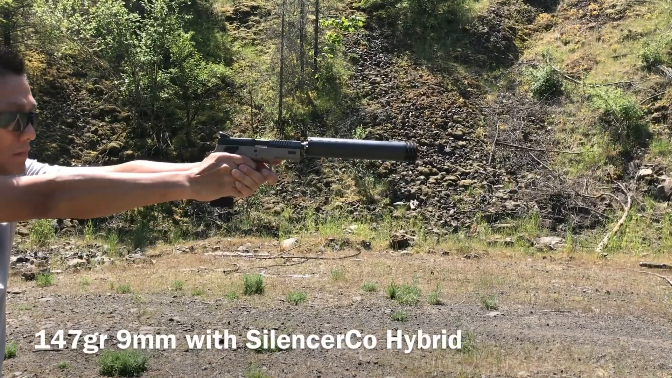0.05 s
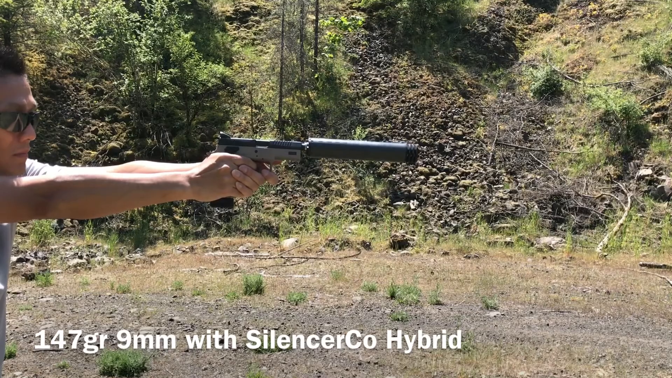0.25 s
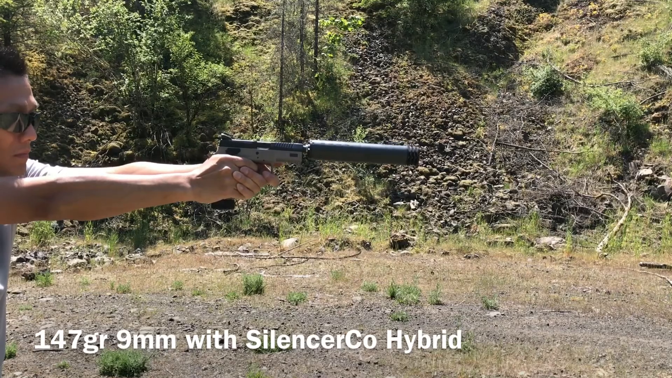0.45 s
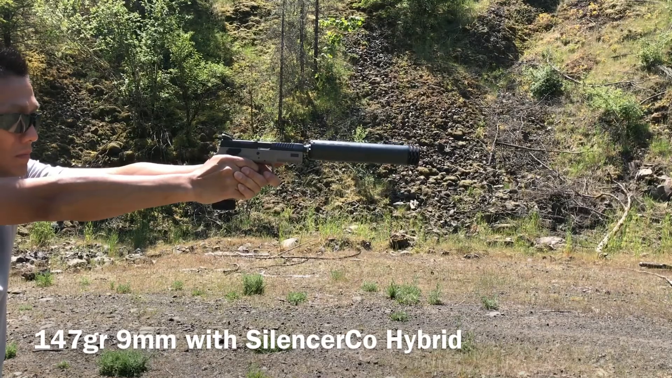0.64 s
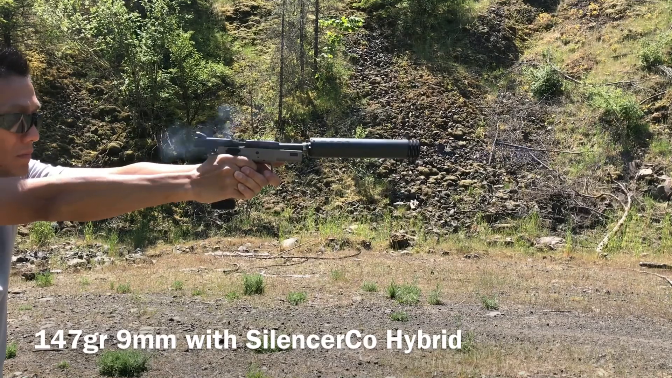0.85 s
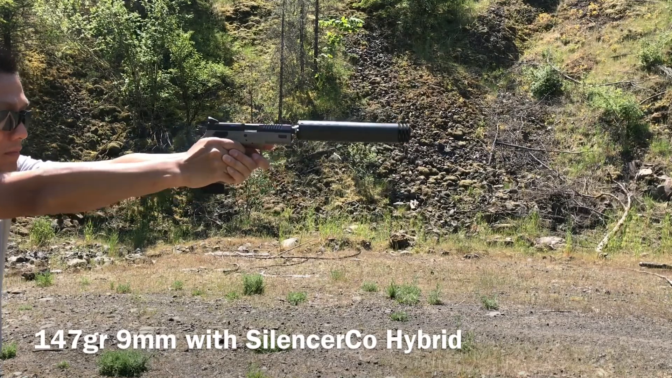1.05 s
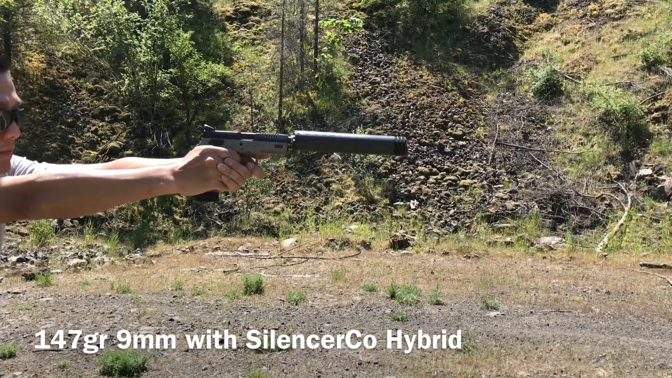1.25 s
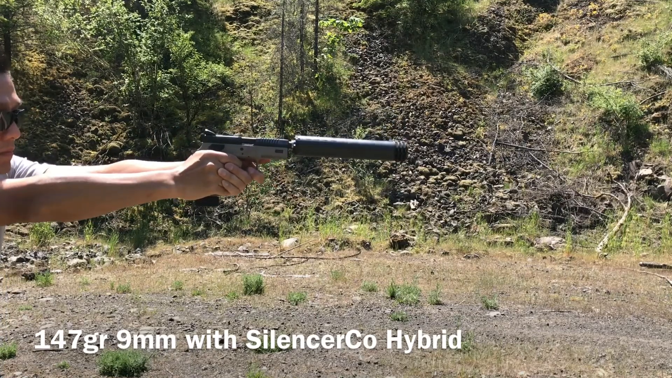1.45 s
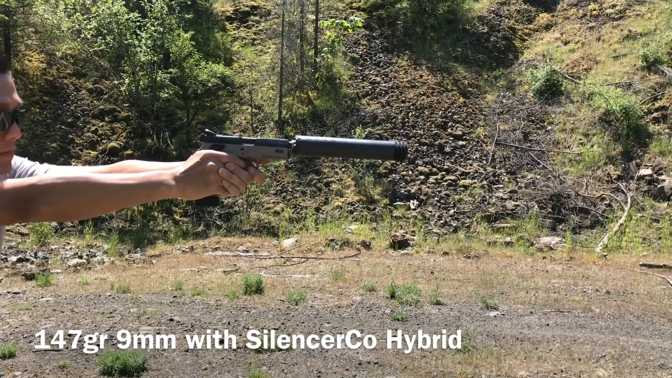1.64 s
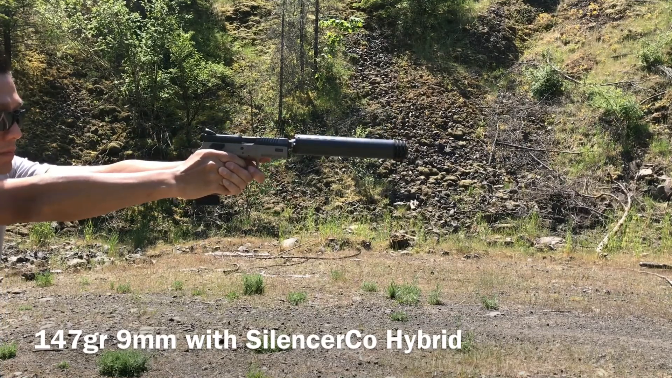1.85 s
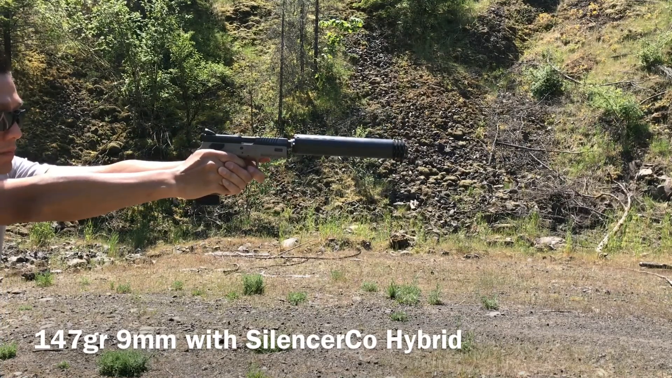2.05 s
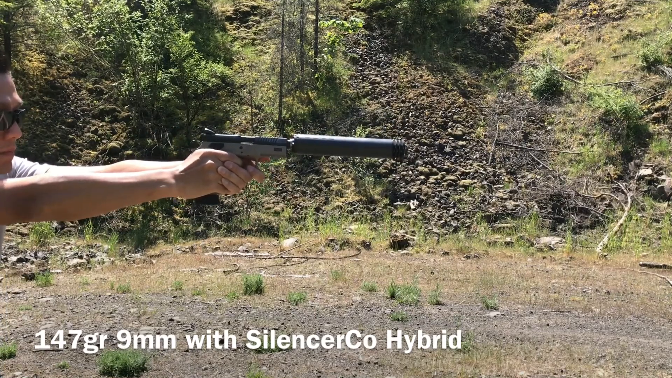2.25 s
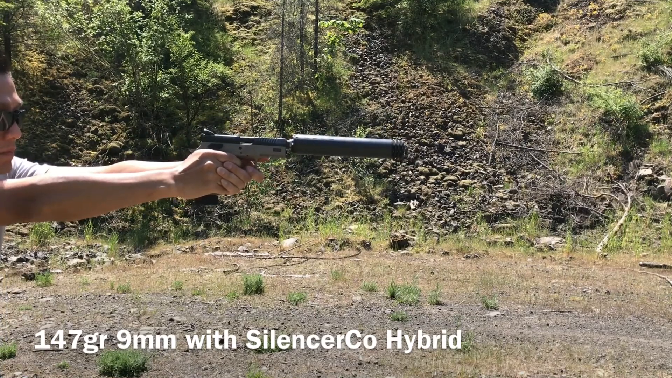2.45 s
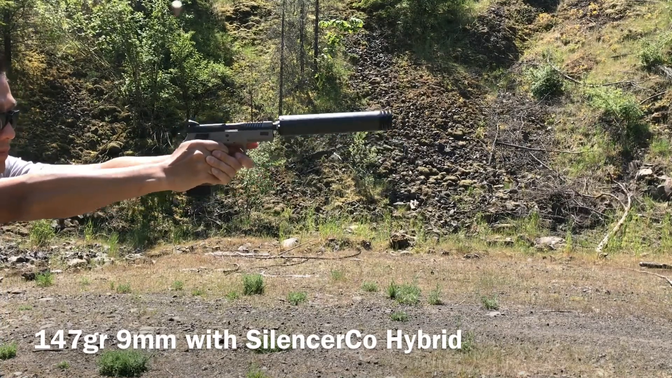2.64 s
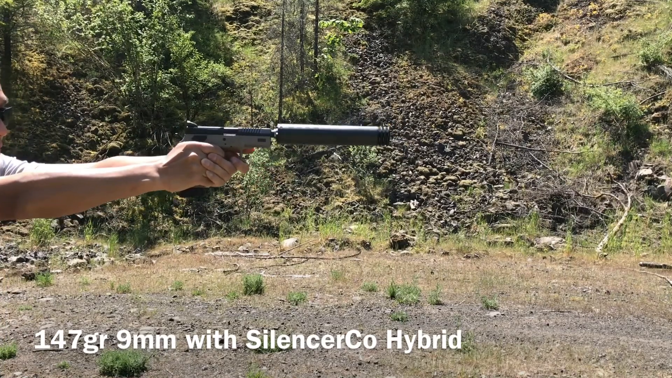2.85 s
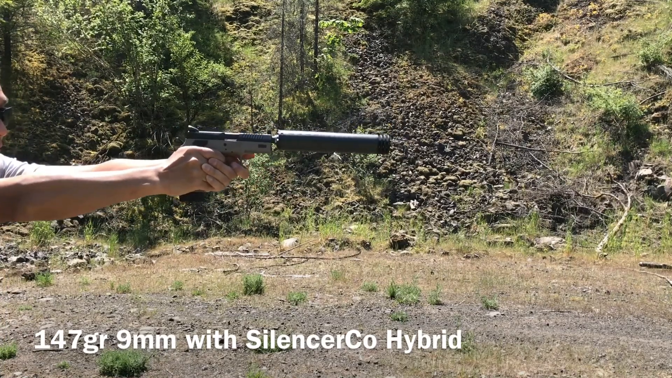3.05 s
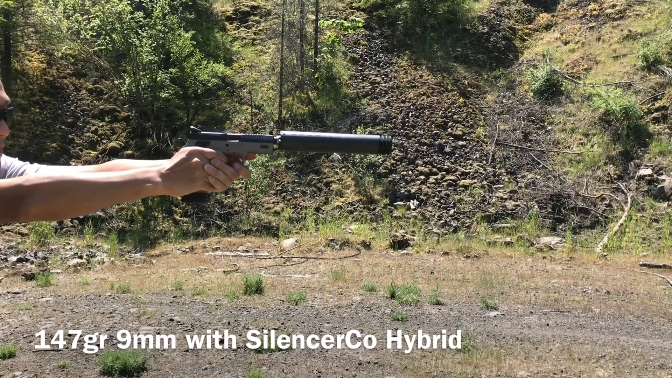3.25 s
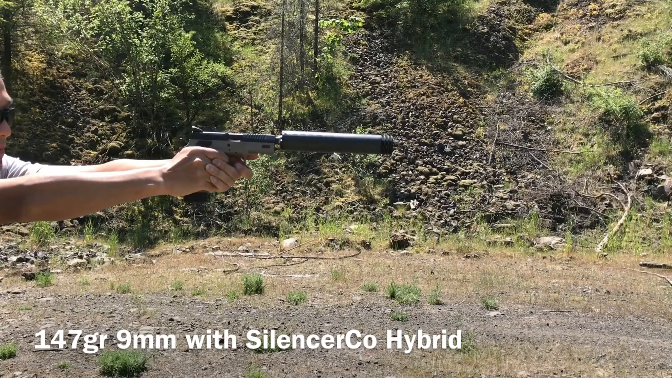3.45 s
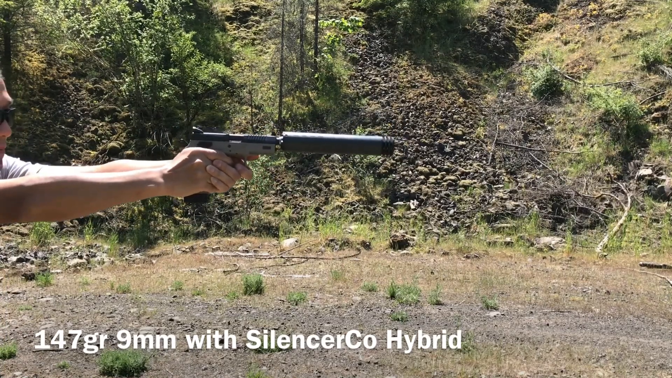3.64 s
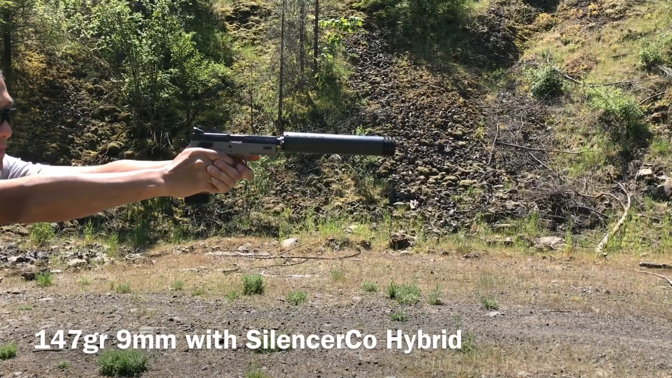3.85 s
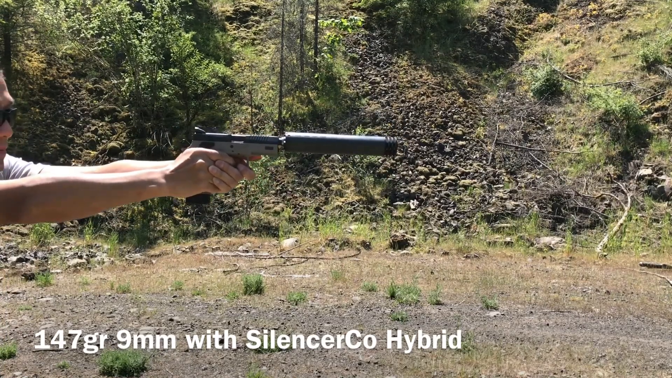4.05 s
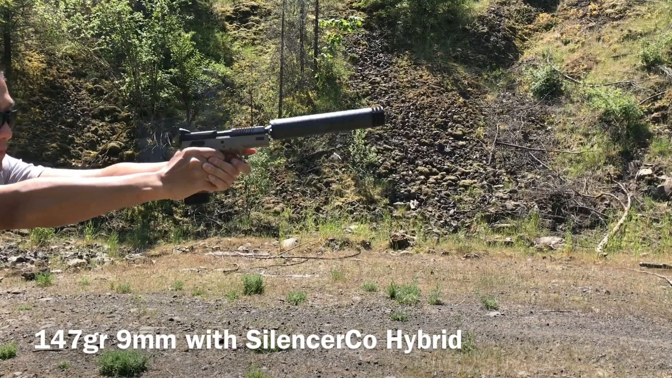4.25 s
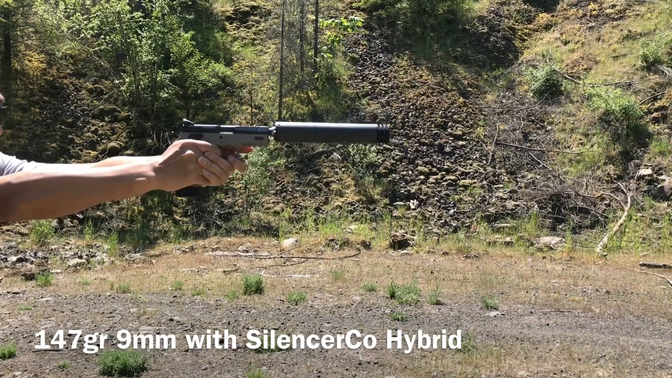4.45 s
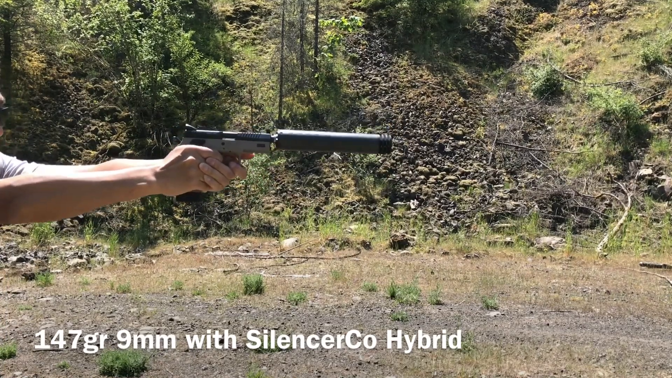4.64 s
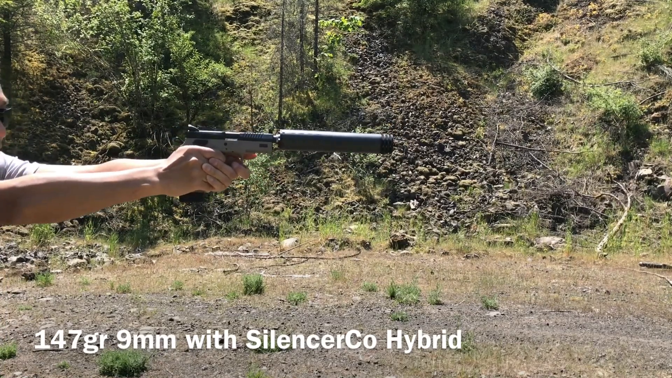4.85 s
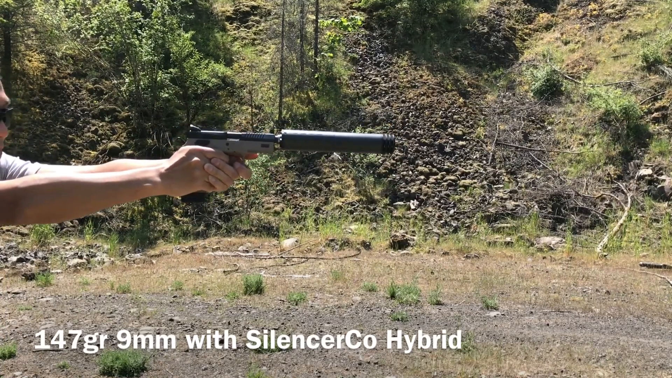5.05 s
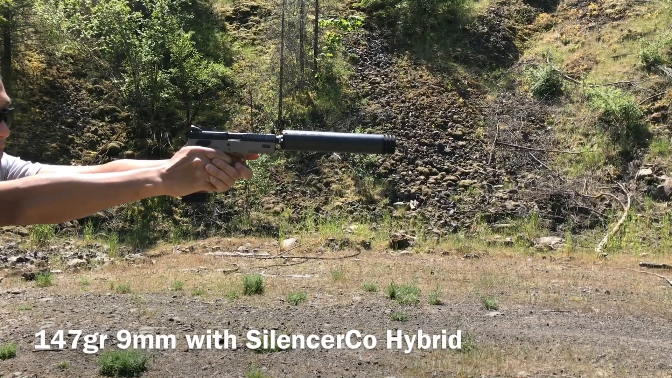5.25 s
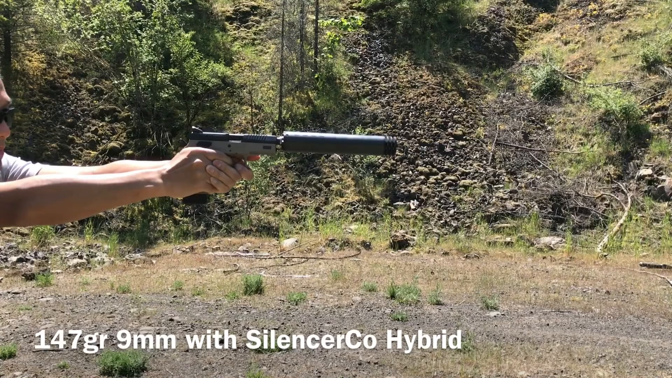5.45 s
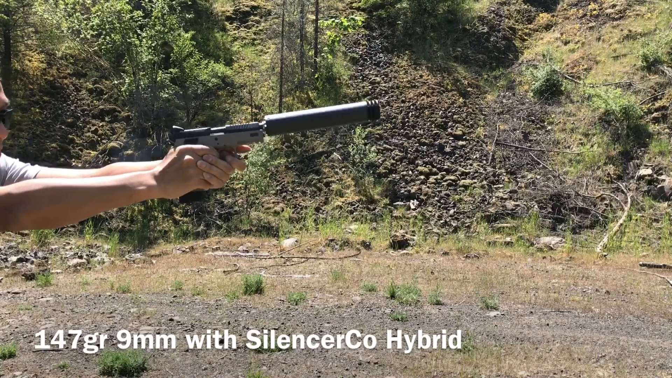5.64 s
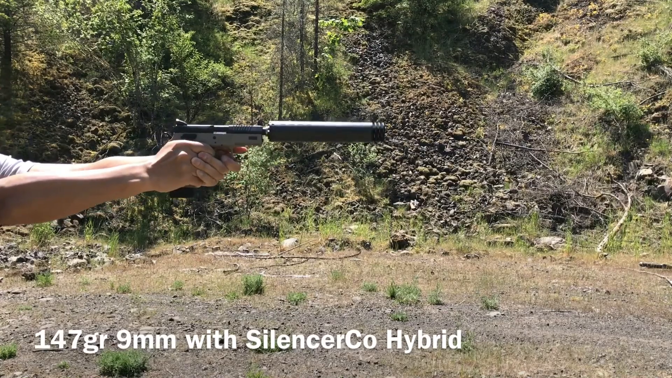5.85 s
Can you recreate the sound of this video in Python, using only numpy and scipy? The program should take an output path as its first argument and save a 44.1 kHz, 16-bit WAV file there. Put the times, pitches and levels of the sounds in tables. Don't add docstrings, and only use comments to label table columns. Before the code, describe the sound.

Four spaced suppressed pistol shots outdoors, each a blunt gassy thump with slide clack, followed by sharp bullet cracks and hillside echoes in light wind.

```python
import sys
import numpy as np
from scipy import signal
from scipy.fft import rfft, irfft
from scipy.io import wavfile
from scipy.ndimage import uniform_filter1d

SR = 44100
rng = np.random.default_rng(int(sys.argv[2]) if len(sys.argv) > 2 else 0)


def gain_from_db(level_db):
    decades = np.asarray(level_db, float) / 20
    return 10 ** decades


def master(y):
    cut = np.clip(np.atleast_2d(y).T, -1, 1)
    pcm = np.round(cut * 32767)
    wavfile.write(sys.argv[1], SR, pcm.astype(np.int16))


N = 260190
T = np.arange(N) / SR

# f/Hz, level/dB
AIR_SPECTRUM = [(240, -25), (400, -1.5), (1150, -0.5), (2400, -13), (4500, -14.5), (7000, -22.5),
                (15500, -26), (16500, -48.5)]
# t/s, level/dB
RUSTLE = [(0, 0.5), (.9, -0.5), (2.2, 0), (3.5, 0), (4.15, -3.5), (5.9, 1.9)]
# t/s, rumble level/dB
BREEZE = [(0, -47.5), (.9, -46), (1.05, -49.5), (1.6, -40.5), (2.15, -46.5), (2.5, -47), (2.75, -56),
          (3.1, -44.5), (3.6, -43.5), (4, -30.5), (4.4, -48.5), (4.9, -38.5), (5.33, -44), (5.6, -44),
          (5.76, -49), (5.9, -47)]
# t/s, rumble level/dB, length/s
EDDIES = [(0.145, -74, 0.021), (0.442, -46.5, 0.06), (0.597, -49.5, 0.04), (0.851, -45, 0.1),
          (1.377, -63, 0.16), (1.53, -42, 0.034), (1.662, -38, 0.028), (1.773, -38, 0.035),
          (2.05, -45, 0.031), (2.31, -33.5, 0.034), (2.429, -50, 0.068), (3.19, -37.5, 0.051),
          (3.45, -45.5, 0.1), (3.685, -34, 0.066), (3.87, -35, 0.062), (4.143, -36, 0.064),
          (4.299, -30.5, .04), (4.453, -45, 0.056), (4.63, -38, 0.07), (4.752, -51, 0.093),
          (5.034, -36, 0.051), (5.161, -33.5, 0.039), (5.458, -43, 0.062), (5.602, -33, 0.091),
          (5.9, -38.5, 0.057)]
# t/s, sharp level/dB, soft level/dB
BUFFETS = [(.45, -58, -40.5), (1.2, -58, -46.5), (1.335, -59, -48), (1.403, -70, -45), (1.465, -57, -42),
           (1.541, -45, -37.5), (1.737, -62, -35.5), (1.985, -58, -42.5), (2.306, -31, -33),
           (2.964, -66, -45), (3.118, -64, -48.5), (3.151, -43, -46), (3.21, -49, -49), (3.891, -36, -42),
           (3.911, -42, -35.5), (3.946, -40.5, -42), (4.086, -48, -37), (4.098, -24, -22),
           (4.127, -42, -43), (4.157, -37, -24), (4.609, -45, -37), (4.628, -35, -33.5), (4.645, -52, -39),
           (4.715, -58, -51), (4.885, -66, -60), (5.001, -58, -29.5), (5.016, -46, -32.5),
           (5.057, -43, -25), (5.435, -58, -38.5), (5.502, -47, -39), (5.518, -56, -33),
           (5.599, -48.5, -44)]
# t/s, level/dB, f/Hz
PUFFS = [(0.364, -37.5, 60), (0.448, -35, 89), (0.483, -41, 65), (0.581, -36.5, 87), (0.755, -42, 59.7),
         (0.836, -38, 74.6), (1.03, -46, 96), (1.325, -39, 69), (1.37, -36, 70), (1.404, -43, 120),
         (1.463, -35.5, 114), (1.515, -33.5, 160), (1.561, -37, 80), (1.593, -35.5, 65),
         (1.659, -29.5, 94.8), (1.766, -31, 84), (1.796, -33, 64.6), (2.04, -36.5, 116), (2.075, -34, 85),
         (2.288, -36.5, 100), (2.327, -30, 75), (3.118, -35, 90), (3.16, -33.5, 95), (3.188, -27, 151),
         (3.227, -29.5, 99), (3.379, -36.5, 90), (3.463, -27.5, 55), (3.551, -33, 96), (3.667, -28.5, 69.5),
         (3.848, -27, 93), (3.893, -32, 115), (3.94, -31.5, 68.6), (4.004, -31.5, 75), (4.039, -31.5, 65.4),
         (4.076, -27.5, 80), (4.13, -26, 65.5), (4.157, -23.5, 124), (4.193, -33, 79), (4.349, -44, 75),
         (4.44, -33.5, 65), (4.578, -29.5, 60), (4.632, -28, 130), (4.678, -37, 60.1), (4.748, -35, 75),
         (4.781, -33, 95.3), (5.001, -28.5, 85), (5.04, -27, 100), (5.091, -29.5, 50.3),
         (5.146, -30.5, 89.5), (5.186, -30, 75), (5.431, -33, 70), (5.499, -32, 76.2), (5.537, -26, 71),
         (5.581, -29, 135)]
# t/s, length/s, first f/Hz, last f/Hz, level/dB
BIRD = [
    (.012, .092, 6100, 4750, -75),
    (.098, .077, 4760, 4460, -64),
    (.22, 0.07, 3080, 3340, -72),
    (.28, 0.053, 3330, 3870, -62),
    (.4, .025, 5300, 4660, -68),
    (.462, 0.036, 5540, 4500, -64.5),
    (.588, .062, 5700, 3610, -64.5),
    (.645, .028, 3600, 2950, -75),
    (.69, .045, 4150, 4500, -73),
]
# t/s, length/s, first f/Hz, last f/Hz, level/dB
INSECT = [
    (.44, 0.027, 11300, 11200, -57),
    (1.79, 0.056, 10840, 10900, -61.5),
    (2.16, 0.079, 10800, 10640, -70),
    (3.38, .03, 10800, 10900, -65),
    (5.065, 0.063, 12750, 12500, -68),
]
# share of note/1, level/dB
BIRD_SWELL = [(0, -2.5), (.7, -0.5), (1, -1)]
INSECT_SWELL = [(0, 2), (.4, -7), (1, -10)]
SPLINTER_SWELL = [(0, 3), (.5, 2), (1, 0)]
# centre t/s, first f/Hz, length/ms, level/dB
CHIPS = [(.422, 4240, 3.6, -57), (.429, 4100, 15, -55), (.445, 3700, 3.2, -40.5), (.453, 3820, 16, -51),
         (.528, 3600, 5.6, -52), (.545, 3760, 20, -55), (.603, 3640, 3.9, -55)]
# t/s, level/dB, strongest f/Hz
GRIT = [(.4445, -42, 3200), (0.451, -43, 3600), (.545, -51, 4400), (1.768, -46, 4400), (1.7833, -38, 1316),
        (2.1938, -47, 1690), (2.339, -44, 5530), (2.346, -39.5, 7000), (2.399, -51, 4410),
        (3.3381, -43, 4400), (3.386, -26, 2400), (3.386, -33, 13000), (3.393, -42, 6470),
        (3.869, -46.5, 3600), (4.198, -48, 2830), (4.3517, -28, 2600), (4.539, -48, 4360),
        (5.118, -45, 2300), (5.599, -51, 2530)]
BLOW_BANDS = [1300, 4400, 11300]
# f/Hz, width/Hz, level/dB
TRIGGER_MODES = [(1750, 2400, 5), (3300, 250, 8.5), (5650, 1700, 5), (10200, 1030, 2), (12640, 800, -4)]
# f/Hz, width/Hz, level/dB
STEEL_MODES = [(1860, 2400, 7), (3100, 630, -0.5), (5290, 270, 9.5), (8900, 460, 2), (12260, 1000, 4)]
FIRED = [
    .9014,
    2.5918,
    4.2534,
    5.6401,
]
# t/s, low level/dB, middle level/dB, high level/dB
HAMMER = [(-.0222, -33, -28, -32), (-.0198, -34.5, -34, -35.5), (-.0166, -36.5, -27, -31),
          (-.0112, -39, -34.5, -41)]
# t/s, low level/dB, middle level/dB, high level/dB
BLAST = [(.0001, -6.5, -6.5, -16), (.0031, -12, -2, -19), (.0063, -13.5, -7, -18),
         (0.0111, -15, -6.5, -11.5)]
# t/s, low level/dB, middle level/dB, high level/dB
SLIDE = [
    (-.009, -30.5, -24, -24),
    (-.0043, -24.5, -20.5, -20),
    (0, -18, -11, -6.5),
    (.0055, -31.5, -28, -22),
    (0.0111, -32, -27, -25.5),
]
# hammer level/dB, blast level/dB, slide level/dB, hammer pace/1, shutting t/s from ignition
STROKES = [(2.5, 0.34, .1, 1.03, .0459), (0, 1, -1.25, .93, .0456), (.5, 0, .6, .96, .0449),
           (-1.5, -2, -0.45, 1.0, .045)]
# level/dB, decay/s
GAS_BURSTS = [(-11.5, .018), (-13, 0.019), (-13, 0.016), (-10.5, 0.014)]
# f/Hz, level/dB
GAS_SPECTRUM = [(180, -32.5), (300, -10.5), (717, -16), (863, -13.5), (2000, -12), (3530, -8), (4030, -9.5),
                (5640, -3.5), (7630, -12.5), (14700, -12.5), (16500, -31.5)]
HAMMER_SONG = [-13.5, -12.5, -22, -14.5]
# centre t/s, first f/Hz, length/ms, level/dB
ROCKS = [(0.9, 2580, 20, -48), (1.145, 3720, 27, -44), (1.19, 3300, 24.6, -55.5), (1.325, 3300, 24, -52.5),
         (1.552, 3230, 10, -53), (2.742, 3600, 12, -34.5), (2.75, 2640, 14, -39), (2.772, 3900, 9.8, -40),
         (2.79, 2630, 16, -44), (2.802, 4300, 8, -52), (2.838, 3220, 11.3, -43), (2.871, 2780, 7, -39),
         (2.882, 3900, 13, -37), (2.893, 2720, 10, -41), (2.92, 3020, 14, -44), (2.922, 4000, 23, -50),
         (2.948, 4000, 28, -50), (2.955, 2830, 16, -48), (2.982, 2480, 9.7, -52), (2.6, 2400, 16, -50),
         (3.015, 2300, 26, -49), (3.17, 2740, 20, -55.5), (3.218, 2780, 14, -56), (3.258, 2630, 21, -46.5),
         (3.292, 3130, 16, -47.5), (3.335, 3480, 21.1, -53.5), (3.362, 3380, 14, -51.5),
         (4.4, 3300, 6.4, -48), (4.45, 3220, 7.1, -52), (4.452, 1500, 16.5, -44.5), (4.57, 2980, 8, -62),
         (5.786, 3400, 7.9, -40.5), (5.805, 2920, 12, -50), (5.822, 2810, 16, -48), (5.85, 2810, 8.5, -52),
         (5.867, 4000, 5, -37), (5.885, 2800, 7.3, -47), (5.896, 2750, 6.8, -42)]
# f/Hz, level/dB, crest t/s from ignition, length/s
TUBE_MODES = [
    (205, -13.5, .0038, 0.0042),
    (760, -12.5, .0012, 0.001),
    (530, -16, .0035, 0.0038),
]
TUBE_LEVELS = [0.46, -1, -1.5, 1]
KNOCK_LEVELS = [-22.5, -22, -21, -25]
# f/Hz, level/dB, t60/s
NEAR_DECAY = [(800, -53, 0.17), (1411, -48.5, 0.39), (2400, -45.5, 0.23), (4000, -45, 0.88),
              (6000, -38.5, 0.43), (8850, -42, 0.34), (13000, -41, .22)]
# t/s, level/dB, slowness/1, first crest/1
THUMPS = [(.909, -3.8, 1.03, .25), (2.6013, -5.2, .95, 1.1), (4.2637, -12.3, 1.19, .8),
          (5.6488, -5.8, 1.0, .6)]
# f/Hz, width/Hz, level/dB
STEEL_TAIL = [(3300, 900, -3), (5400, 370, 2), (7000, 1500, -6), (9400, 1500, -7), (12500, 3000, -11)]
# first t/s, last t/s, level/dB
SWARMS = [(0.963, 1.104, -50.5), (1.099, 1.252, -56), (1.251, 1.704, -61.5), (2.661, 2.799, -48.5),
          (2.796, 2.96, -47), (3.05, 3.378, -62), (4.326, 4.597, -52.5), (4.601, 4.95, -63),
          (5.742, 5.885, -51)]
# f/Hz, level/dB
SLOPE_SPECTRUM = [(400, -25.5), (800, -16.5), (1300, -7.5), (2300, -1.5), (3400, -0.5), (4600, -9),
                  (6500, -10), (10000, -24.5), (13000, -36.5)]
# loudest t/s, level/dB, swell/(dB/s), fade/(dB/s)
RETURNS = [(0.974, -37, 2996, 142), (1.139, -40, 148, 114), (1.33, -55.5, 153, 11), (2.69, -48, 302.5, 22),
           (2.831, -32, 63, 132), (2.955, -45.5, 79.5, 500), (3.331, -52.5, 20.5, 68), (3.7, -63.5, 33, 11),
           (4.345, -69, 897, 123), (4.445, -40, 900, 300), (4.505, -47.5, 118, 112), (4.75, -61.5, 38, 7),
           (5.715, -57, 905, 50), (5.9, -35, 83, 100)]
RETURN_TREBLE = [7.5, -0.5, -2.5, 0, 2.5, -0.5, -5, -2.5, -3.5, 1, 1.5, 0, -3, -1.5]
# t/s, peak level/dB, f/Hz, ring/ms, grit level/dB
STRIKES = [
    (1.0753, -3, 5130, 0.081, -30.5),
    (2.823, -9, 6600, 0.093, -30.5),
    (2.8215, -19, 2000, 0.27, -35),
    (4.429, -17.5, 5700, 0.17, -43),
    (4.4293, -20.5, 3450, 0.18, -45),
    (4.4314, -29, 2020, 1, -50),
    (5.861, -19.5, 5000, 0.089, -37),
    (5.8639, -23.5, 3500, 0.089, -41),
]
# t/s, f/Hz, level/dB
RICOCHETS = [
    [(1.08, 860, -58), (1.11, 787, -57), (1.155, 677, -57), (1.22, 580, -58), (1.29, 510, -79)],
    [(2.835, 587, -53), (2.874, 922, -51), (2.898, 1080, -53), (2.935, 1126, -58), (2.985, 1060, -67),
     (3.02, 984, -61), (3.07, 900, -71), (3.12, 823, -75)],
    [(2.64, 274, -48), (2.7, 282, -61), (2.81, 290, -76)],
    [(2.86, 560, -59), (2.91, 595, -65), (2.96, 620, -66)],
]
# t/s, high level/dB, low level/dB, middle level/dB
RESETS = [
    (1.5665, -18.5, -25.5, -21),
    (3.6661, -17, -27, -21.5),
    (5.1277, -16.5, -30, -21),
]
BOUNCE = [-22, -24, -22]
# t/s, level/dB, chatter delay/s
SNAPS = [(1.56648, -11, .0003), (3.66615, -9, .0005), (5.12768, -8.5, .0005)]
# f/Hz, level/dB, t60/s
SEAR_MODES = [(1210, -23.5, 0.018), (1786, -20, 0.011), (3213, -16, .006), (4900, -27.5, 0.0029),
              (5903, -15, 0.0057), (6880, -16.5, 0.0055), (9850, -3.5, 0.0022), (12030, -7, .003)]
# t/s, length/s, first f/Hz, last f/Hz, level/dB
SPLINTERS = [(2.805, 0.0257, 2453, 1463, -38.5), (2.824, 0.027, 6100, 3470, -34.5),
             (2.827, 0.0146, 7500, 5600, -34), (2.834, .014, 3100, 2100, -38.5),
             (2.866, .014, 2900, 1900, -42), (2.874, 0.016, 4180, 2710, -36),
             (2.886, .014, 2800, 2000, -39), (2.767, 0.0135, 3890, 2790, -34.5),
             (2.776, 0.015, 2580, 1490, -39.5), (2.905, .02, 3520, 2290, -49)]
# first t/s, last t/s, hiss level/dB
COARSE = [(.878, 1.485, -4), (1.566, 1.975, 0), (2.569, 3.232, -4), (3.666, 4.075, 0), (4.23, 4.93, -4),
          (5.127, 5.535, 0), (5.617, 5.9, -4)]
# f/Hz, level/dB
HUM = [(9663, -95.5), (10740, -96.5), (11811, -92.5), (12882, -100), (13959, -95.5), (15030, -97)]


def unit(x):
    return x / np.sqrt(np.mean(x ** 2))


def band(lo_hz, hi_hz, order=2):
    sos = signal.butter(order, [lo_hz, hi_hz], "band", fs=SR, output="sos")
    return unit(signal.sosfilt(sos, rng.standard_normal(N)))


def coloured(table):
    hz, db = np.transpose(table)
    f = np.arange(N // 2 + 1) * SR / N + 1
    weight = gain_from_db(np.interp(np.log(f), np.log(hz), db, -90, -90))
    return unit(irfft(rfft(rng.standard_normal(N)) * weight, N))


def ring(x, hz, width_hz):
    return signal.lfilter(*signal.iirpeak(hz, hz / width_hz, SR), x)


def walk(rate):
    k = max(int(SR / rate), 2)
    held = np.repeat(rng.standard_normal(N // k + 1), k)
    return uniform_filter1d(uniform_filter1d(held, k), k)[:N]


def fade(start, tau, rise=.0002):
    t = np.maximum(T - start, 0)
    return (1 - np.exp(-t / rise)) * np.exp(-t / tau)


def bell(s, length):
    return np.exp(-((T - s) / length) ** 2)


def notes(rows, swell):
    u = np.linspace(0, 1, 9)
    shape_db = np.interp(u, *np.transpose(swell))
    return [np.transpose([s + length * u, from_hz + (to_hz - from_hz) * u ** 0.99, db + shape_db])
            for s, length, from_hz, to_hz, db in rows]


def whistles(tracks, waver, flutter_db, share):
    out = np.zeros(N)
    for rows in tracks:
        s, hz, db = np.transpose(rows)
        on = (T > s[0]) & (T < s[-1])
        t, w = T[on], waver[on]
        edge = np.clip(np.minimum(t - s[0], s[-1] - t) / 0.0055, 0, 1)
        pitch = np.interp(t, s, hz) * (1 + share * w)
        level = gain_from_db(np.interp(t, s, db) + flutter_db * w)
        out[on] += edge * level * np.sin(2 * np.pi * np.cumsum(pitch) / SR)
    return out


def clumps(rows, fall):
    out = np.zeros(N + 4000)
    t = np.arange(-2000, 2000) / SR
    for (s, from_hz, ms, db), noise in zip(rows, rng.standard_normal((len(rows), len(t)))):
        u = t / ms * 2000
        hz = from_hz * (1 + fall + (fall - 1) * np.clip(u, -2, 2)) / 2
        rough = .45 + unit(uniform_filter1d(uniform_filter1d(noise, size=36), size=36))
        i = int(s * SR) - len(t) // 2
        out[i:i + len(t)] += gain_from_db(db) * rough * np.exp(-u ** 2) * np.sin(2 * np.pi * np.cumsum(hz) / SR)
    return out[:N]


def clanks(rows, modes, rise, tau, low_tau):
    out, t = np.zeros(N + 1200), np.arange(1200) / SR
    edges = [(600, 2700), (2300, 8500), (7500, 17000)]
    filters = [signal.butter(2, pair, "band", fs=SR, output="sos") for pair in edges]
    for (s, *dbs), noises in zip(rows, rng.standard_normal((len(rows), 3, len(t)))):
        i = int((s - rise) * SR)
        for sos, db, noise, fall in zip(filters, dbs, noises, [low_tau, tau, tau]):
            blow = noise * (1 - np.exp(-t / rise)) * (np.exp(-t / fall) + .05 * np.exp(-t / .0035))
            rung = blow + sum(gain_from_db(g) * ring(blow, hz, w) for hz, w, g in modes)
            x = signal.sosfilt(sos, rung)
            out[i:i + len(t)] += gain_from_db(db + 1.0) * x / np.max(np.abs(x))
    return out[:N]


def air():
    return coloured(AIR_SPECTRUM) * gain_from_db(-65 + np.interp(T, *np.transpose(RUSTLE)) + walk(2.3))


def wind():
    gust = gain_from_db(np.interp(T, *np.transpose(BREEZE)))
    gust = gust + sum(gain_from_db(db) * bell(s, length) for s, db, length in EDDIES)
    stirred = np.minimum(sum(bell(row[0], 0.015) for row in BUFFETS), 1)
    rumble = gain_from_db(-4) * unit(band(36, 105) * gain_from_db(3 * walk(16)))
    flutter = unit(band(120, 320, order=3) * gain_from_db(4.5 * walk(40)))
    out = gust * (rumble + flutter * (gain_from_db(-19.5) + gain_from_db(-11) * stirred))
    t = np.arange(-900, 900) / SR
    for (s, sharp_db, soft_db), (wide, turn) in zip(BUFFETS, rng.random((len(BUFFETS), 2))):
        sharp = np.sin(2 * np.pi * ((420 + 200 * wide) * t + turn)) * np.exp(-np.abs(t / 0.0014) ** 1.1)
        soft = np.sin(2 * np.pi * ((170 + 110 * turn) * t + wide)) * np.exp(-((t - .002) / 0.0046) ** 2)
        i = int(s * SR) - len(t) // 2
        out[i:i + len(t)] += gain_from_db(sharp_db + 1) * sharp + gain_from_db(soft_db) * soft
    return out


def calls(waver):
    direct = whistles(notes(BIRD, BIRD_SWELL), waver, 1, .002)
    direct = direct + whistles(notes(INSECT, INSECT_SWELL), waver, 1.3, .005)
    t = np.arange(9000) / SR
    trail = uniform_filter1d(rng.standard_normal(len(t)), size=4) * np.exp(-t / .12) * np.clip(t / .04, 0, 1)
    return direct + gain_from_db(-34.0) * signal.fftconvolve(direct, trail)[:N]


def puffs():
    out, t = np.zeros(N), np.arange(-1500, 1500) / SR
    for s, db, hz in PUFFS:
        i = int(s * SR) - len(t) // 2
        out[i:i + len(t)] -= gain_from_db(db) * np.cos(2 * np.pi * hz * t) * np.exp(-(t * hz / 0.84) ** 2)
    return out


def chips():
    return clumps(CHIPS, 0.97)


def grit():
    octaves = [np.abs(np.log2(np.array(BLOW_BANDS) / hz)) for s, db, hz in GRIT]
    rows = [(s, *(db - 7.5 * away)) for (s, db, hz), away in zip(GRIT, octaves)]
    return clanks(rows, TRIGGER_MODES, .00006, .0005, .0016)


def action():
    rows = []
    for s, (hammer_db, blast_db, slide_db, pace, shut) in zip(FIRED, STROKES):
        rows += [(s + at * pace, *(np.array(dbs) + hammer_db)) for at, *dbs in HAMMER]
        rows += [(s + at, *(np.array(dbs) + blast_db)) for at, *dbs in BLAST]
        rows += [(s + shut + at, *(np.array(dbs) + slide_db)) for at, *dbs in SLIDE]
    scatter = 1.5 * rng.standard_normal((len(rows), 4)) * [0, 1, 1, 1]
    return clanks(np.array(rows) + scatter, STEEL_MODES, .0003, .0012, .0014)


def gas():
    jet = coloured(GAS_SPECTRUM) * gain_from_db(1.6 * walk(600))
    boom = band(170, 640)
    out = 0
    for s, (gas_db, tau), sing_db in zip(FIRED, GAS_BURSTS, HAMMER_SONG):
        burst = jet * fade(s, tau) + gain_from_db(-4.5) * boom * fade(s - .001, 0.0066, rise=0.0011)
        before = np.where((T > s - .015) & (T < s), np.exp(np.minimum(T - s, 0) / 0.0087), 0)
        shudder = before * (gain_from_db(sing_db) * np.sin(2 * np.pi * 3100 * T) + gain_from_db(-11.5) * boom)
        rattle = gain_from_db(-29.5) * jet * ((T > s - .0225) & (T < s))
        out = out + gain_from_db(gas_db) * (burst + shudder + rattle)
    return out


def rocks():
    return clumps(ROCKS, .79)


def tube():
    out, fall = 0, .66
    for s, shot_db, stroke, knock_db in zip(FIRED, TUBE_LEVELS, STROKES, KNOCK_LEVELS):
        for hz, db, crest, length in TUBE_MODES:
            swing = np.cos(2 * np.pi * hz * (T - s - crest))
            out = out + gain_from_db(db + shot_db) * swing * bell(s + crest, length)
        u = (T - s - stroke[-1] + .0042) / .0015
        hz = 2400 * (1 + fall + (fall - 1) * np.clip(u, -1, 1)) / 2
        out = out + gain_from_db(knock_db) * np.sin(2 * np.pi * np.cumsum(hz) / SR) * np.exp(-u ** 2)
    return out


def ground_ring():
    out = 0
    for hz, db, t60 in NEAR_DECAY:
        tail = sum(fade(s + 0.0067, t60 / np.log(1000), rise=0.005) for s in FIRED)
        leaves = band(hz / 1.55, min(hz * 1.5, 17000), order=1)
        out = out + gain_from_db(db + 0.7 * walk(45)) * tail * leaves
    return out


def thumps():
    out = 0
    for s, thump_db, slow, crest in THUMPS:
        t = (T - s) / slow
        swell = np.clip(1 + t / .001, 0, 1) * (1 - (1 - crest) * np.exp(-np.maximum(t, 0) / .003))
        turns = 51.5 * t + .718 * (1 - np.exp(-np.maximum(t, -.0013) / .00247))
        out = out + gain_from_db(thump_db) * np.cos(2 * np.pi * turns) * swell * np.exp(-np.abs(t / .0235) ** 3.4)
    return out


def trees():
    out, noise = 0, rng.standard_normal(N)
    ground = sum(gain_from_db(-50) * fade(s + 0.05, .7 / np.log(1000), rise=.02) for s in FIRED)
    bank = sum(gain_from_db(-45) * bell(s + 0.098, 0.017) for s in FIRED)
    for hz, w, db in STEEL_TAIL:
        linger = 0.023 * np.log2(12500 / hz)
        line = sum(bell(s + 0.28 + linger, 0.064 + linger) for s in FIRED)
        colour = gain_from_db(db - 5.5 + 2.5 * walk(45)) * unit(ring(noise, hz, w))
        out = out + colour * (ground + bank + gain_from_db(-58.5) * line)
    return out


def swarms(count=26):
    rows = [(a + (b - a) * when, 1900 * 2 ** (1.25 * pitch ** 1.5), 6 + 14 * long, db - 8 * size)
            for a, b, db in SWARMS for when, pitch, long, size in rng.random((count, 4))]
    return clumps(rows, 0.8)


def slope_echo():
    body = coloured(SLOPE_SPECTRUM)
    patches = [ring(body, hz, hz / 3) * gain_from_db(3.5 * np.minimum(walk(70), 1.3))
               for hz in 700 * 2 ** np.arange(0, 3.8, .4)]
    dull, bright = np.array([sum(patches[:7]), sum(patches[7:])]) / np.std(sum(patches))
    powers = []
    for s, db, swell, fade_rate in RETURNS:
        after_shot = T > max(shot for shot in FIRED if shot < s)
        falling = fade_rate * (s - T) - 21.5 * (T - s) ** 2
        powers.append(after_shot * gain_from_db(db + np.minimum(swell * (T - s), falling)) ** 2)
    powers = np.array(powers)
    treble = gain_from_db(np.array(RETURN_TREBLE)) ** 2 @ powers
    heard = dull * np.sqrt(powers.sum(axis=0)) + bright * np.sqrt(treble)
    return gain_from_db(0.65 * walk(340) - 5.0) * heard


def strikes():
    out, spray, dirt = 0, 0, band(790, 6600, order=1)
    for s, peak_db, hz, ms, grit_db in STRIKES:
        t = T - s
        out = out - gain_from_db(peak_db) * np.cos(2 * np.pi * hz * t) * np.exp(-np.abs(t) * 1000 / ms)
        spray = spray + gain_from_db(grit_db) * dirt * fade(s, 0.0035)
    out = signal.sosfilt(signal.butter(2, [600, 11000], "band", fs=SR, output="sos"), out)
    out = signal.sosfiltfilt(signal.butter(4, 13000, fs=SR, output="sos"), out)
    return out + 1.1 * ring(out, 2630, 780) + spray


def ricochets(waver):
    bullets = whistles(RICOCHETS, waver, 3.5, .012)
    splinters = whistles(notes(SPLINTERS, SPLINTER_SWELL), waver, 3.5, .015)
    return gain_from_db(-2) * bullets + gain_from_db(-3) * splinters


def sear():
    out, t = np.zeros(N), np.arange(900) / SR
    tap = sum(gain_from_db(db) * np.sin(2 * np.pi * hz * t) * np.exp(-np.log(1000) * t / t60)
              for hz, db, t60 in SEAR_MODES)
    for s, db, chatter in SNAPS:
        for late, tap_db in [(0, 0), (chatter, -8), (0.0011, -4.5)]:
            i = int((s + late) * SR)
            out[i:i + len(t)] += gain_from_db(db + tap_db) * tap
    return signal.sosfilt(signal.butter(2, 700, "high", fs=SR, output="sos"), out)


def trigger_resets():
    resets = [(s, low_db, mid_db, db) for s, db, low_db, mid_db in RESETS]
    bounces = [(s + .006, *(high_db + np.array(BOUNCE))) for s, high_db, *_ in RESETS]
    return clanks(resets + bounces, TRIGGER_MODES, .00006, .0005, .0016)


def scene():
    mix = air()
    mix = mix + action() + trigger_resets() + grit()
    mix = mix + rocks() + chips()
    mix = mix + gas() + thumps() + strikes() + ground_ring() + slope_echo()
    waver = walk(200)
    mix = mix + calls(waver) + ricochets(waver)
    mix = mix + wind() + puffs() + trees() + swarms() + sear() + tube()
    return mix[None]


def top_cut(x):
    return signal.sosfilt(signal.butter(12, 16810, fs=SR, output="sos"), x)


def record(dry):
    hiss_range = sum(gain_from_db(db) * ((T > a) & (T < b)) for a, b, db in COARSE)
    hiss = hiss_range * gain_from_db(-67) * band(1500, 15000, order=1)
    hum = sum(gain_from_db(db + 6.0) * np.sin(2 * np.pi * hz * T) for hz, db in HUM)
    x = np.tanh(1.157 * (dry + hiss + hum))
    x = signal.sosfilt(signal.ellip(6, .3, 30, 15650, fs=SR, output="sos"), x)
    return top_cut(np.clip(x, -1, 1))


dry = scene()
out = record(dry)
master(out)
```